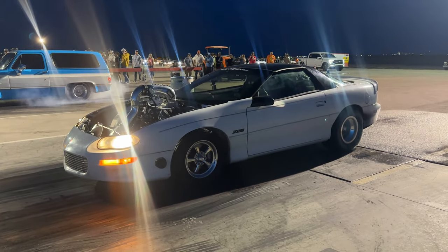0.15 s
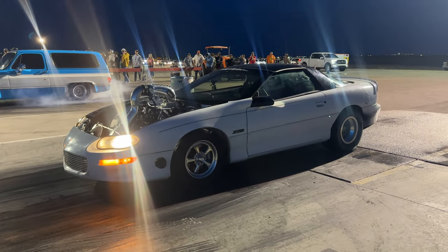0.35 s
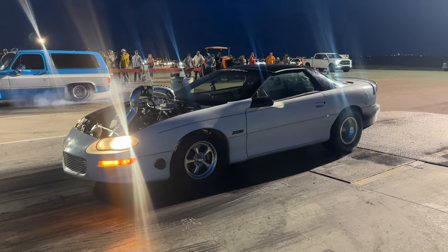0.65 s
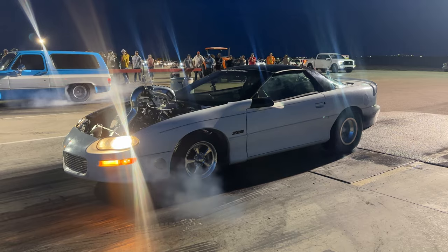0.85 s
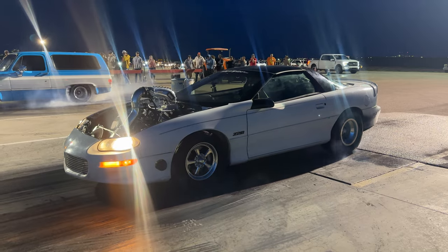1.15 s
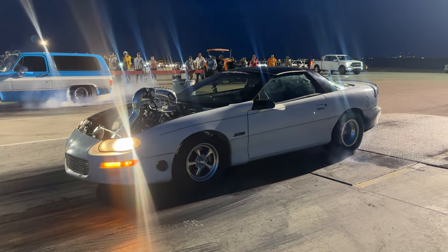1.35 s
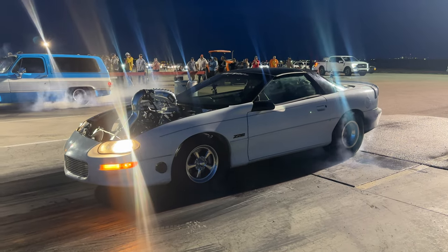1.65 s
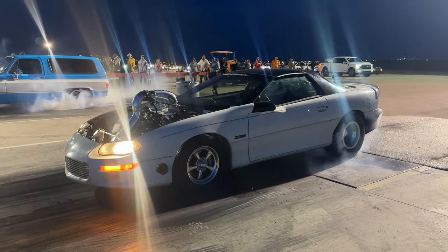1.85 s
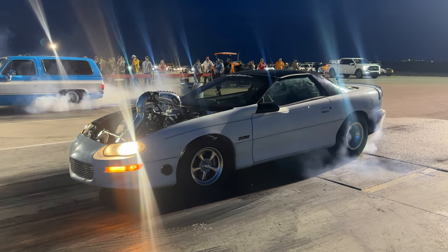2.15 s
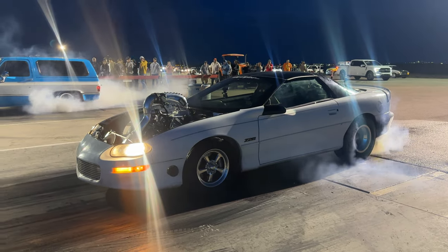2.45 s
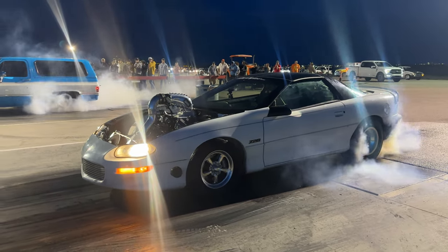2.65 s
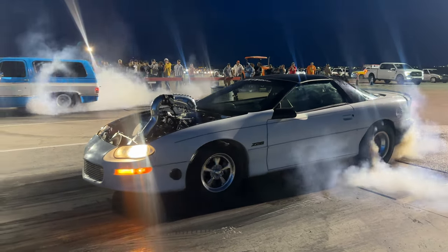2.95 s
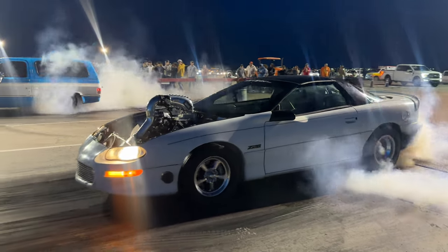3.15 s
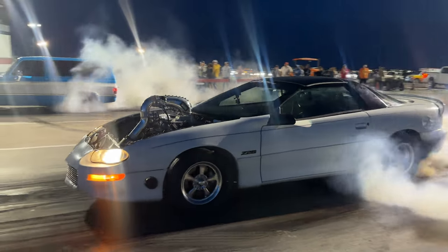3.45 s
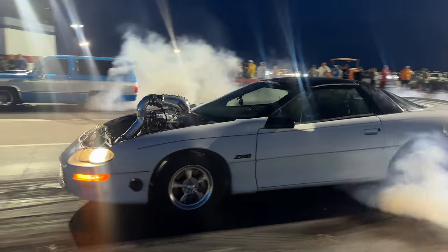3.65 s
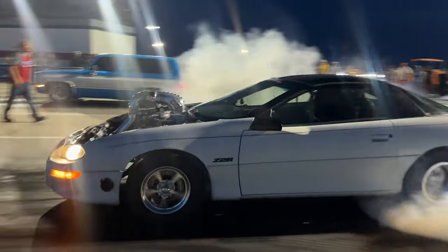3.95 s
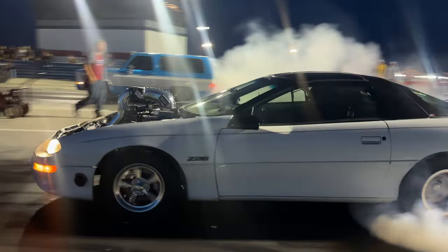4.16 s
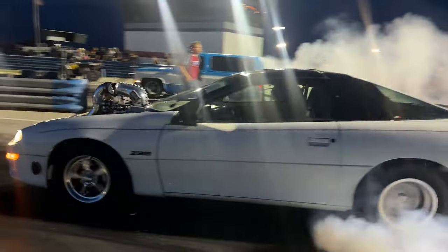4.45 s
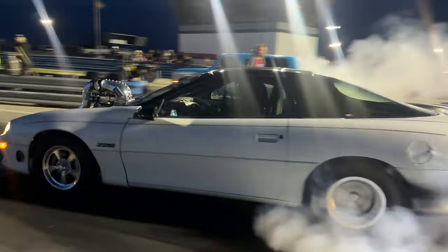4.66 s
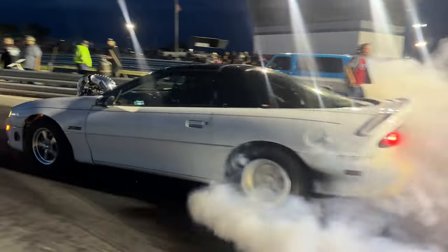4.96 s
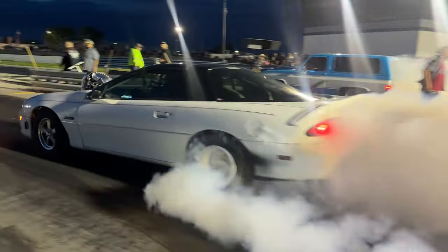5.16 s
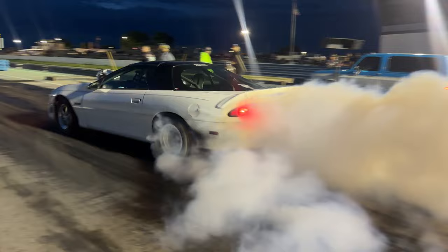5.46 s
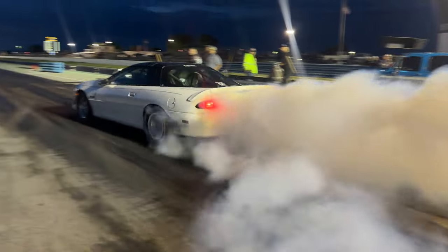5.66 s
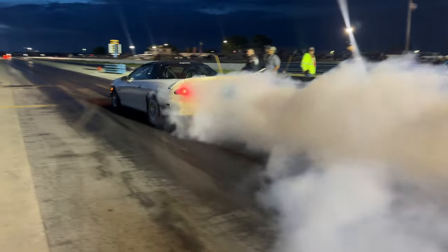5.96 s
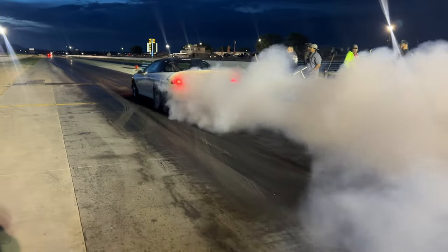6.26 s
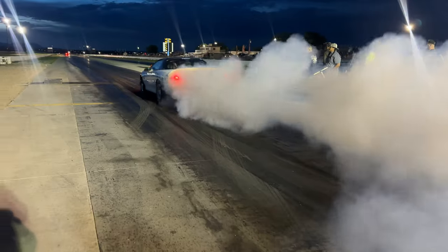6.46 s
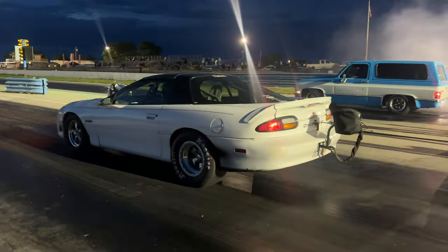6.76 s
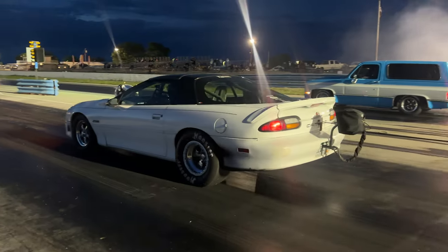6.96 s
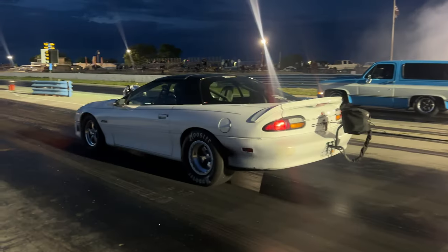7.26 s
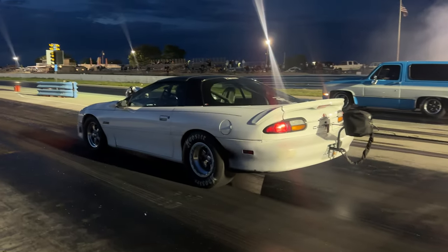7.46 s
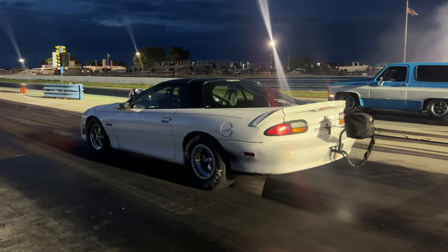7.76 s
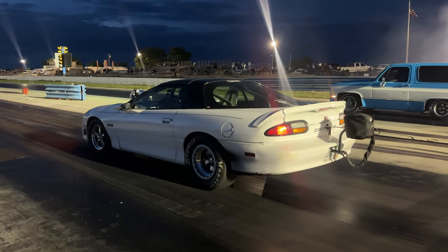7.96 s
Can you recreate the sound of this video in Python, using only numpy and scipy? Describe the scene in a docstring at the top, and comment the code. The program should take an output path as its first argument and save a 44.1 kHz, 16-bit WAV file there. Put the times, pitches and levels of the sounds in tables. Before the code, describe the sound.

A turbocharged V8 car is heard from trackside at a drag strip. For the first 1.5 seconds it labours against the brakes, its exhaust stuttering and banging under a fluttering turbo whistle, with a very brief throttle lift near 0.7 seconds. The revs then climb, loudest at about 2 seconds, and hold as a wavering burnout roar with hissing exhaust and turbo. From about 4.7 seconds the car moves away, the engine growing duller, lower and quieter while the whistle winds down. Near 5.4 seconds the tyres give one short, falling chirp and the throttle shuts, leaving a faint, distant burble. At about 6.8 seconds the sound switches abruptly to close behind the car: a loud, deep, loping idle with uneven thumps and small spits of gas, lasting until the end at around 8 seconds.

```python
"""Burnout on a drag strip

A turbocharged V8, heard from trackside on a stereo microphone, builds boost against the brakes, its
exhaust stuttering and banging with unburnt fuel. It spins its tyres, rolls past and away, and the tyres
chirp as they bite. Far down the strip the turbo's whistle winds down and the engine burbles.
Then, abruptly, the microphone is close behind the car, which lopes at idle."""
import sys
import numpy as np
from scipy import signal
from scipy.fft import rfft, irfft, next_fast_len
from scipy.io import wavfile
from scipy.ndimage import uniform_filter1d

SR = 44100
rng = np.random.default_rng(int(sys.argv[2]) if len(sys.argv) > 2 else 0)


def unload_audio(sound):
    """Save the sound as a 16-bit wav file, at the path given as the first command line argument."""
    columns = np.transpose(np.atleast_2d(sound))
    # keep every value between -1 and 1, then stretch to whole-number steps
    steps = np.round(np.clip(columns, -1, 1) * 32767)
    wavfile.write(sys.argv[1], SR, steps.astype(np.int16))


N = 357651
TIME = np.arange(N) / SR
PADDED = next_fast_len(N + SR // 2)
BINS = np.maximum(np.arange(PADDED // 2 + 1) * SR / PADDED, 1)
REOPEN_S, SHUT_S = .79, 5.45   # the throttle reopens after a brief lift; it shuts for good
CLOSE_S = 6.788   # the microphone is close behind the car from here on


def from_db(db):
    """Decibels to gain."""
    return np.exp(np.asarray(db) * (np.log(10) / 20))


def ramp(start_s, length_s):
    """A straight rise from 0 to 1."""
    return np.clip((TIME - start_s) / length_s, 0, 1)


def in_time(rows):
    """The columns of a curve at every sample."""
    s, *columns = np.transpose(rows)
    return [np.interp(TIME, s, c) for c in columns]


def in_frequency(rows):
    """The columns of a spectrum at every bin."""
    hz, *columns = np.transpose(rows)
    return [np.interp(np.log(BINS), np.log(hz), c) for c in columns]


def lowpass(x, hz, order=2):
    """Roll off the treble above hz."""
    return signal.sosfilt(signal.butter(order, hz, fs=SR, output="sos"), x)


def coloured(x, spectrum):
    """Minimum-phase filter of unit energy, shaped like the spectrum."""
    gain = from_db(in_frequency(spectrum)[0])
    cepstrum = irfft(np.log(gain / np.sqrt(np.mean(gain ** 2))), PADDED)
    cepstrum[1:PADDED // 2] *= 2
    cepstrum[PADDED // 2 + 1:] = 0
    return irfft(rfft(x, PADDED) * np.exp(rfft(cepstrum)), PADDED)[..., :N]


def evened(x, size=4000):
    """Hold the slow level at rms 1; single beats stay."""
    power = uniform_filter1d(uniform_filter1d(x * x, size), size)
    return x / np.sqrt(np.abs(power) + 1e-12)


def drift(hz):
    """Random wander of spread 1, mostly slower than hz."""
    pole = np.exp(-16 * np.pi * hz / SR)
    noise = rng.standard_normal(N // 8 + 2002)
    slow = signal.lfilter([1], [1, -2 * pole, pole * pole], noise)[2000:]
    return np.interp(np.arange(N) / 8, np.arange(len(slow)), slow / slow.std())


def puffs(clicks, rise_s):
    """Each click swells to its own height in rise_s and dies away."""
    pole = np.exp(-1 / (rise_s * SR))
    return signal.lfilter([0, np.e / (rise_s * SR)], [1, -2 * pole, pole * pole], clicks + 1e-18)


def clicks_at(events):
    """One click for each row of t/s, level/dB."""
    s, level_db = np.transpose(events)
    return np.bincount((s * SR).astype(int), from_db(level_db), N)[:N]


def chance_clicks(per_s, level_db, scatter_db=2):
    """Clicks at random moments and of unequal height."""
    return (rng.random(N) < per_s / SR) * from_db(level_db + scatter_db * rng.standard_normal(N))


def gas_noise(spread=0.59):
    """Turbulence; part of its midrange reaches each side of the microphone by its own path."""
    midrange = signal.butter(2, [900, 6000], "band", fs=SR, output="sos")
    own_path = signal.sosfilt(midrange, rng.standard_normal((2, N)))
    return rng.standard_normal(N) + spread * own_path


# Engine speed through the burnout, a cycle being two turns and eight firings: t/s, cycle rate/Hz
CYCLE_RATE = [(0.0, 28.4), (0.28, 28.2), (0.66, 31.9), (0.8, 25.9), (1.0, 27.7), (1.1, 29.8), (1.3, 32),
              (1.5, 38.3), (1.59, 39.6), (1.81, 48), (2.02, 55), (2.1, 49.5), (2.6, 48.0), (2.8, 42),
              (2.91, 41.4), (3.17, 42.1), (3.49, 46.3), (3.66, 45.7), (4.0, 49.5), (4.4, 52), (4.68, 49),
              (5.12, 38.0), (5.41, 31.7), (5.55, 24.8)]
IDLE_HZ = 13.2


def engine_speed(settle_s=.3):
    """Cycles per second: driven through the burnout, sinking to idle, then hunting with the lope."""
    end_s, end_hz = CYCLE_RATE[-1]
    sinking = IDLE_HZ + (end_hz - IDLE_HZ) * np.exp(-np.maximum(TIME - end_s, 0) / settle_s)
    return np.select([TIME < end_s, TIME < CLOSE_S], [in_time(CYCLE_RATE)[0], sinking], hunting_speed())


def driving():
    """Shares from 0 to 1: labouring on the brakes, throttle lifted, car turned away, throttle shut."""
    labour = 1 - ramp(1.38, .45)   # the tyres let go
    lift = ramp(.68, 0.0538) - ramp(REOPEN_S, 0.019)
    away = ramp(2.7, 2.3)
    shut = ramp(SHUT_S, 0.091)
    return labour, lift, away, shut


# Cylinders in firing order, the bank nearer the microphone louder: pulse height, spit level/dB
FIRING_ORDER = [(0.98, 1), (.35, -8), (0.99, -3), (0.98, -9), (0.349, -10.5), (0.99, -5), (.35, -11),
                (0.3506, -9.5)]
PULSE_HEIGHTS, SPIT_DB = np.transpose(FIRING_ORDER)


def firings(cycles, heights, scatter_db):
    """Eight clicks a cycle, each scattered about its cylinder's height."""
    slot = np.floor(cycles * len(heights)).astype(int)
    at = np.flatnonzero(np.diff(slot))
    chance = np.clip(rng.standard_normal(size=4000), -2, 2)[slot[at]]
    return np.bincount(at, heights[slot[at] % len(heights)] * from_db(scatter_db * chance), N)


# Engine orders: multiple of the cycle rate, level/dB
ENGINE_ORDERS = [(1.0, -18.5), (2.0, -23.5), (3.0, -5), (4.0, -11.5), (5.0, -2.5), (6.0, -11.5),
                 (7.0, -14.5), (8.0, 1.4), (9.0, -5), (10.0, -2.5), (11.0, -3.5), (12.0, -13.5),
                 (13.0, 0.5), (14.0, -5), (15.0, -7.5), (16.0, -0.5), (17.0, 0.5), (18.0, -1.5), (19.0, -6),
                 (20.0, -9.5), (21.0, -1), (22.0, 3), (23.0, -3.5), (24.0, -5), (25.0, 1), (26.0, 2.5),
                 (27.0, -6.5), (28.0, -3.5)]
# A dip near 340 Hz that hollows the exhaust note in the middle of the burnout: f/Hz, level/dB
PIPE_NOTCH = [(80, 0), (150, -1), (225, 2), (340, -4.5), (410, -.5), (600, 1), (1000, 0), (1400, 2)]
# Change of the note with the car's tail to the microphone: f/Hz, level/dB
FROM_BEHIND = [(50, -4), (120, 6), (180, 2), (260, -7), (350, 0), (470, -2), (650, 3.5), (1100, -3)]
# Resonances of the exhaust pipe: f/Hz, level/dB
PIPE_COLOUR = [(28.0, -34), (50.0, -6), (85.0, 0.5), (140.0, -4), (190.0, -3), (255.0, 1), (320.0, -3),
               (400.0, -7.5), (490.0, -16), (680.0, -15.5), (830.0, -18), (1050.0, -20.5), (1500.0, -36)]


def exhaust_note(cycles, speed, labour, away, shake_cycles=0.0026):
    """Engine orders ring in the pipe, duller and less steady under labour; the crank shakes a little."""
    slots = np.arange(8) / 8
    waver = .1 + 0.13 * labour
    tilt_db_per_octave = -1.7 - 5 * labour - 6 * away
    angle = 2 * np.pi * ((cycles + shake_cycles * drift(38)) % 1)
    notch, behind = ramp(2.37, 0.42), ramp(4.53, 0.33)
    upper_orders = [(k, 1) for k in range(29, 37)]
    note = np.zeros(N)
    for multiple, level_db in list(ENGINE_ORDERS) + upper_orders:
        k = round(multiple)
        hz = k * speed
        lead = np.angle(np.sum(PULSE_HEIGHTS * np.exp(-2j * np.pi * k * slots)))   # aligned on firings
        notch_db = notch * (1 - behind) * np.interp(hz, *np.transpose(PIPE_NOTCH))
        behind_db = behind * np.interp(hz, *np.transpose(FROM_BEHIND))
        tilt_db = tilt_db_per_octave * np.clip(np.log2(hz / 300), 0, 1.5)
        gain = from_db(level_db + notch_db + behind_db + tilt_db)
        note += gain * (1 + waver * drift(15.6)) * np.cos(k * angle + lead)
    return evened(coloured(note, PIPE_COLOUR))


# Uneven combustion from trackside: f/Hz, level/dB
RUMBLE_COLOUR = [(25, -42.5), (45, -19.5), (70, -5), (150, -5), (190, -14), (255, 0.5), (350, -2),
                 (450, -14.5), (720, -12), (900, -19.5), (1100, -23), (1300, -24.5), (2000, -36.5),
                 (4000, -49.5)]


def rumble(cycles):
    """Unequal firings, each a random kick and a gust of gas."""
    beats = firings(cycles, PULSE_HEIGHTS, scatter_db=2.5)
    kicks = evened(beats * rng.standard_normal(N))
    gusts = evened(puffs(beats, rise_s=0.0013) * gas_noise())
    return evened(coloured(kicks + 1.15 * gusts, RUMBLE_COLOUR))


# Escaping gas from trackside: f/Hz, level/dB
HISS_COLOUR = [(600, -21.5), (1400, 10), (2300, 6), (3000, 1.5), (3900, 0), (5200, 1), (6600, 1),
               (7400, -5), (8400, 1), (10000, -2), (12500, -6), (15000, -3.5), (16000, -19.5)]


def gas_hiss(cycles):
    """Each firing spits gas; the passing body briefly hides the highest hiss from the microphone."""
    spits = puffs(firings(cycles, from_db(SPIT_DB), scatter_db=3.5), rise_s=0.00094)
    flow = uniform_filter1d(spits, size=70) + 0.08
    hiss = evened(coloured(flow * gas_noise(), HISS_COLOUR))
    dull = lowpass(hiss, 5000, order=1)
    treble_db = 3.5 - 4 * np.exp(-((TIME - 4.784) / 0.32) ** 2)
    return dull + from_db(treble_db) * (hiss - dull)


# The exhaust from trackside once the throttle reopens: t/s, note level/dB, hiss level/dB
PASS_LEVELS = [(0.98, -20.5, -41.5), (0.99, -17, -43), (1.38, -16, -42.5), (1.48, -16.5, -40),
               (1.55, -15, -39), (2.05, -10.5, -32.5), (2.46, -15.5, -37), (2.97, -17, -39),
               (4.16, -16, -43.5), (4.36, -15.5, -39), (5.09, -26, -51.5), (5.36, -28.5, -57)]


def burnout(cycles, speed, labour, lift, away, shut, staging_note_db=-15, staging_hiss_db=-41):
    """Note, rumble and hiss: a labouring engine rumbles more, a closed throttle quiets all three."""
    note_db, hiss_db = in_time(PASS_LEVELS)
    shut_db = -19.5 * shut
    note_db = np.where(TIME < REOPEN_S, staging_note_db, note_db) + shut_db
    hiss_db = np.where(TIME < REOPEN_S, staging_hiss_db, hiss_db) + 0.72 * shut_db
    uneven = from_db(note_db - 16 + 9 * labour - 14.5 * lift) * rumble(cycles)
    hiss = from_db(hiss_db - 7 * lift) * gas_hiss(cycles)
    note = from_db(note_db - 22 * lift) * exhaust_note(cycles, speed, labour, away)
    return (note + uneven + hiss) * (1 - ramp(5.58, .17))


TURBO_HZ, WASTEGATE_HZ, SPOOL_HZ_PER_S = 4550, 6730, 470
COAST_S, COAST_DECAY_S, COAST_END_HZ = 4.7, 1.15, 2100


def turbo_pitch(speed):
    """Rises with engine speed and time on boost up to the wastegate's limit, then winds down."""
    driven = np.minimum(TURBO_HZ + 240 * (speed - 28) + SPOOL_HZ_PER_S * TIME, WASTEGATE_HZ)
    coasting = COAST_END_HZ + (WASTEGATE_HZ - COAST_END_HZ) * np.exp((COAST_S - TIME) / COAST_DECAY_S)
    return np.where(TIME < COAST_S, driven, coasting)


def turbo(cycles, speed, labour, lift, away, bend=0.036, clear_blur=.017):
    """The whistle flares and bends up with the strongest exhaust pulses; strong flow blurs it to a hiss."""
    level_db = -58 + 12.5 * labour + 3 * lift + 3 * away - 20.5 * ramp(SHUT_S, 0.33)
    flow = (1 - lift) * (1 - ramp(SHUT_S, .7))
    flow_blur = .038 * labour + .125 * (1 - labour)
    blur = clear_blur + flow * (flow_blur - clear_blur)
    between_pulses = .01 + 0.28 * lift + away * (.22 + flow)
    kicks = puffs(firings(cycles, from_db(2.2 * SPIT_DB), scatter_db=3.5), rise_s=.0012)
    hz = turbo_pitch(speed) * (1 + bend * (kicks - .5) + blur * (drift(898) + drift(25)))
    flare = between_pulses * from_db(3.5 * drift(70)) + kicks
    return from_db(level_db) * evened(flare * np.sin(2 * np.pi * np.cumsum(hz) / SR))


# Air over the open strip: f/Hz, level/dB
AIR_COLOUR = [(200, 13), (1000, 5.5), (4000, -2), (9000, -4.5), (16000, -10)]


def air(level_db=-72):
    """A faint, even hiss all round the microphone."""
    return from_db(level_db) * coloured(rng.standard_normal((2, N)), AIR_COLOUR)


# The loudest bangs in the pipe: t/s, relative level/dB
FUEL_BANGS = [(.279, -8.5), (.506, -20), (.69, -16), (.797, -20.5), (.92, -12), (1.312, -12), (1.408, -17),
              (1.457, -15), (1.536, -15.5)]
# A bang from trackside: f/Hz, level/dB
BLAST_COLOUR = [(40, -30), (100, 1.5), (280, 14.5), (550, 8), (850, -3), (1300, -8), (2500, -23),
                (8000, -22.5), (16000, -25.5)]


def bangs(labour, gain_db=3, punch=4):
    """Unburnt fuel fires in the pipe: a pressure front, then a blast of gas. Labour adds small pops."""
    clicks = clicks_at(FUEL_BANGS) + chance_clicks(per_s=10 * labour, level_db=-22)
    front = punch * uniform_filter1d(clicks, size=8)
    blast = puffs(clicks, rise_s=.0019) * gas_noise()
    return from_db(gain_db) * coloured(front + blast, BLAST_COLOUR)


# Partials of the tyre squeal: multiple, level/dB
SQUEAL_PARTIALS = [(1, 2), (2, 5), (3, 4), (4, -1), (5, -23)]
# Rubber scrubbing on the track: f/Hz, level/dB
SCRUB_COLOUR = [(200, -11), (700, 9), (1800, -1.5), (3500, 7.5), (5500, -10), (8000, -0.5), (16000, -20)]


def tyre_chirp(start_s=5.395, attack_s=0.094, release_s=.048, start_hz=1560, fall_hz_per_s=3600):
    """Down the strip the tyres bite: hot rubber sticks and slips in a rough, falling squeal."""
    hz = start_hz - fall_hz_per_s * np.clip(TIME - start_s, 0, attack_s + release_s)
    turns = np.cumsum(hz * (1 + .06 * drift(346))) / SR
    squeal = sum(from_db(db) * np.sin(2 * np.pi * round(k) * turns) for k, db in SQUEAL_PARTIALS)
    scrub = coloured(gas_noise(), SCRUB_COLOUR)
    sliding = ramp(start_s, attack_s) - ramp(start_s + attack_s, release_s)
    return sliding * from_db(-33 + 1.8 * drift(90)) * (evened(squeal) + 0.57 * scrub)


def idle_beats(cycles, scatter_db):
    """Slow, unequal firings, each a soft push with a gust of gas."""
    beats = firings(cycles, PULSE_HEIGHTS, scatter_db)
    push = lowpass(evened(beats), 500)
    return push + evened(puffs(beats, rise_s=0.0066) * gas_noise())


# The idle from far down the strip: f/Hz, level/dB
FAR_IDLE_COLOUR = [(25, -27.5), (55, 9), (85, 1.5), (150, 0.5), (260, -10.5), (400, -22), (700, -19.5),
                   (1100, -27.5), (1600, -32), (3000, -30.5), (6000, -40), (10000, -39), (16000, -57)]


def far_idle(cycles, speed, shut, throb=0.26):
    """The distant engine burbles, throbbing once a cycle, louder while it still turns fast."""
    beats = idle_beats(cycles, scatter_db=2.5) * (1 + throb * np.cos(2 * np.pi * cycles))
    level_db = -50.5 + 0.73 * (speed - IDLE_HZ)
    return shut * from_db(level_db) * evened(coloured(beats, FAR_IDLE_COLOUR))


# The idle sags and recovers, close behind the car: t/s, level/dB
NEAR_IDLE_LEVELS = [(6.82, -12), (7.05, -15), (7.07, -22), (7.216, -18), (7.594, -19), (8.04, -14)]
# Its boom at that distance: f/Hz, level/dB
NEAR_IDLE_COLOUR = [(25, -49.5), (40, -18.5), (55, 8.5), (80, 3.5), (140, 3.5), (190, -8.5), (250, -7),
                    (330, -18.5), (480, -24), (700, -21.5), (950, -22.5), (1400, -38.5), (3000, -44),
                    (7000, -54), (16000, -63)]
# The hardest firings of the lope: t/s, relative level/dB
HARD_FIRINGS = [(6.789, -39.5), (6.813, -32), (6.851, -30.5), (6.878, -35), (6.892, -32.5), (6.918, -31.5),
                (7.002, -37.5), (7.031, -38.5), (7.218, -36), (7.257, -34), (7.314, -33), (7.368, -37.5),
                (7.407, -36.5), (7.518, -39), (7.576, -41), (7.616, -37), (7.668, -36), (7.701, -33),
                (7.801, -35.5), (7.848, -32.5), (7.881, -34), (7.924, -35.5), (7.954, -34), (7.997, -35.5),
                (8.071, -33.5)]


def near_idle(cycles, thump_gain_db=68, spit_gain_db=-3):
    """A racing cam lopes: among weak firings a few hard ones thump and spit."""
    hard = clicks_at(HARD_FIRINGS) + chance_clicks(per_s=6, level_db=-41.5)
    thumps = lowpass(from_db(thump_gain_db) * hard, 450)
    beats = idle_beats(cycles, scatter_db=0.5) + thumps
    boom = from_db(in_time(NEAR_IDLE_LEVELS)[0]) * evened(coloured(beats, NEAR_IDLE_COLOUR))
    return boom + from_db(spit_gain_db) * pipe_spit(hard)


def hunting_speed(centre_hz=12.3, hz_per_db=0.63):
    """Cycle rate of the near idle: the engine turns faster when it fires harder."""
    swell_db = in_time(NEAR_IDLE_LEVELS)[0] - np.mean(NEAR_IDLE_LEVELS, axis=0)[1]
    return centre_hz + hz_per_db * swell_db


# A puff of gas, close to the tailpipe: f/Hz, level/dB
PUFF_COLOUR = [(300, 2), (700, 8.5), (1000, 10), (1500, -6), (2400, 6.5), (4000, -5.5), (5800, 2),
               (7300, -1.5), (8800, 0.5), (12000, -5), (16000, -11)]
# A low ring and the turbo's two chirps with each puff: f/Hz, relative level/dB
SPIT_RINGS = [(720, 11.5), (2800, -0.5), (5700, 2.5)]


def pipe_spit(hard):
    """Each hard firing puffs gas, with a low ring and a turbo chirp at a slightly different pitch each time."""
    gust = uniform_filter1d(puffs(hard, rise_s=0.0037), size=200)
    spit = coloured((gust + from_db(-52.5)) * gas_noise(), PUFF_COLOUR)
    for hz, level_db in SPIT_RINGS:
        turns = np.cumsum(hz * (1 + .1 * drift(13) + .05 * drift(700))) / SR
        spit += from_db(level_db - 7 + 4.2 * drift(21)) * gust * np.sin(2 * np.pi * turns)
    return spit


# The microphone's two ports: f/Hz, left lead/rad, left over right/dB, relative scatter level/dB
MICROPHONE_PORTS = [(100, 0.12, 1, -21.5), (285, 0.23, -1.5, -14), (462, 1.42, 5.5, -11),
                    (621, -1.5, 1, 0.5), (1017, 2.5, 8, -4), (1426, 2, 5.5, -3.5), (1623, 3, 3.5, -0.5),
                    (2000, 1.5, 0, -5), (3000, 1.76, 8, -3), (4800, 1, 3, -14), (6300, 1.5, 4.5, -17.5),
                    (7670, 1.25, 3.5, -5.5), (10000, -2, 0, -22), (11060, -3, 0, -21),
                    (12680, -4.5, 2, -14.5), (15000, -6.5, -1.5, -12)]


def at_microphone(x, wet_db=-4, decay_s=0.018):
    """Each port hears the direct sound at its own phase and level, plus scatter from track and walls."""
    lead, balance_db, scatter_db = in_frequency(MICROPHONE_PORTS)
    sides = np.array([[1], [-1]])
    direct = from_db(sides * balance_db / 2) * np.exp(.5j * sides * lead)
    tails = rng.standard_normal((2, N)) * np.exp(-TIME / decay_s) * (TIME > .002)
    tails /= np.linalg.norm(tails, axis=1, keepdims=True)
    response = direct + from_db(scatter_db + wet_db) * rfft(tails, PADDED)
    return irfft(rfft(x, PADDED) * response, PADDED)[:, :N]


def scene():
    """One engine drives exhaust and turbo, heard first from trackside, then from close behind."""
    speed = engine_speed()
    cycles = np.cumsum(speed) / SR
    labour, lift, away, shut = driving()
    exhaust = burnout(cycles, speed, labour, lift, away, shut) + bangs(labour)
    whistle = turbo(cycles, speed, labour, lift, away)
    trackside = exhaust + whistle + tyre_chirp() + far_idle(cycles, speed, shut)
    return at_microphone(np.where(TIME < CLOSE_S, trackside, near_idle(cycles))) + air()


def record(dry):
    """The highest peaks are rounded off and the treble above 16.1 kHz is cut."""
    held = dry / (1 + dry ** 8) ** (1 / 8)
    return signal.sosfilt(signal.ellip(10, .1, 80, 16100, fs=SR, output="sos"), held)


dry = scene()
out = record(dry)
unload_audio(out)
```